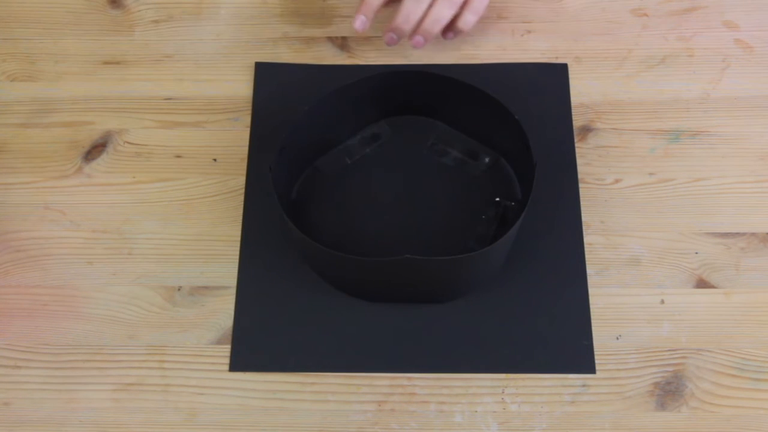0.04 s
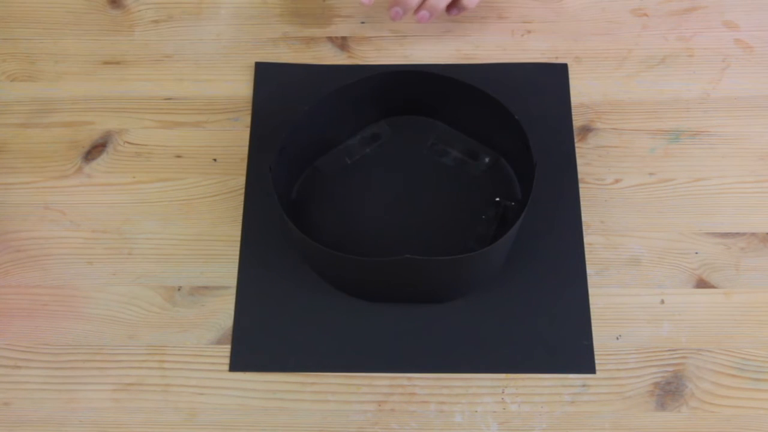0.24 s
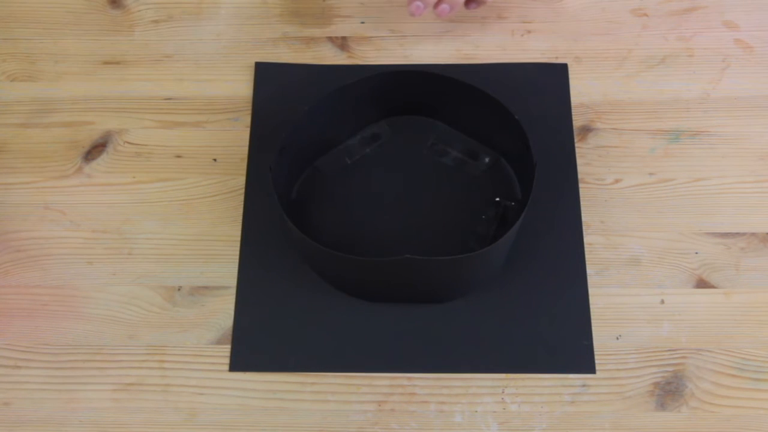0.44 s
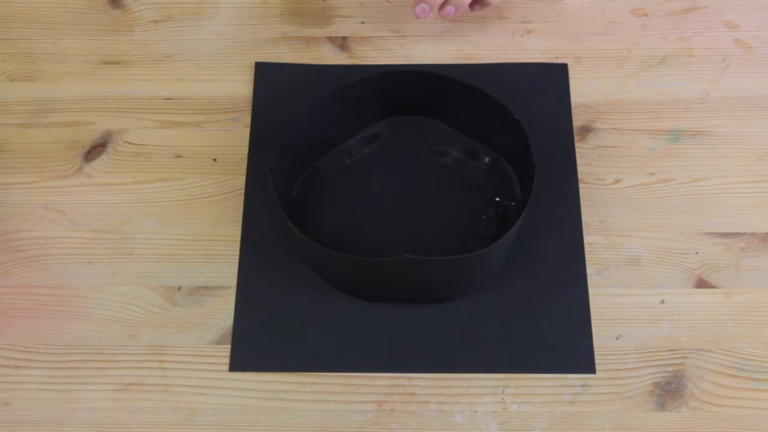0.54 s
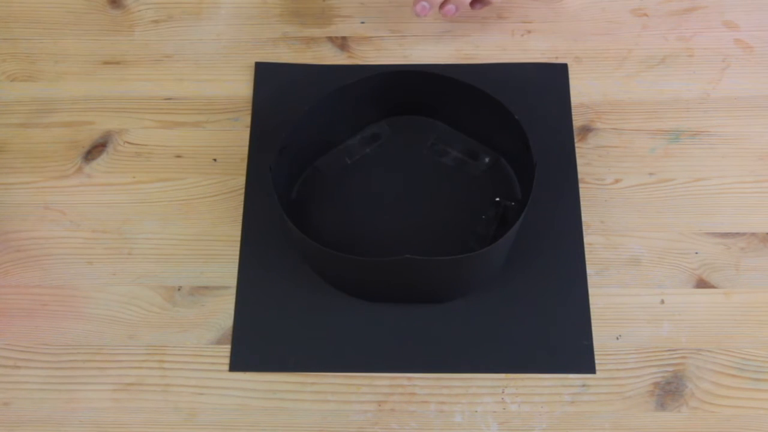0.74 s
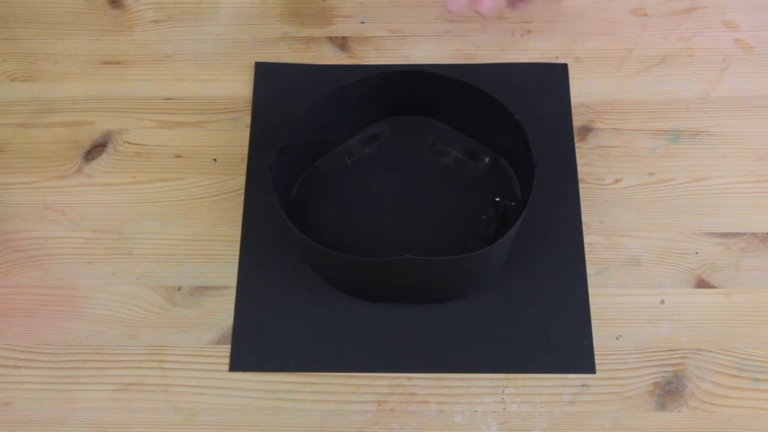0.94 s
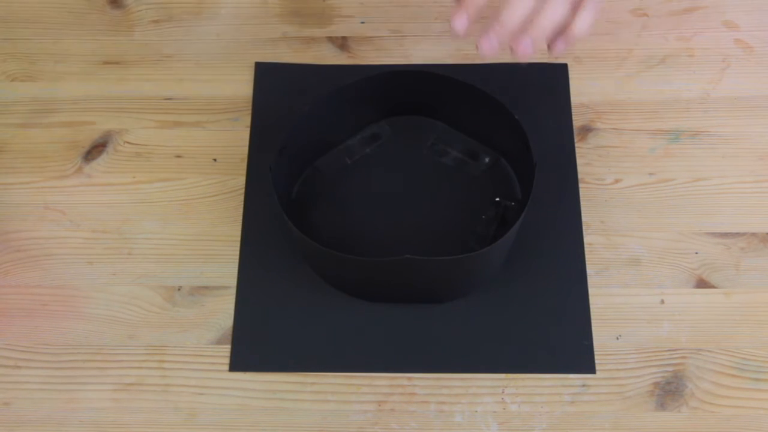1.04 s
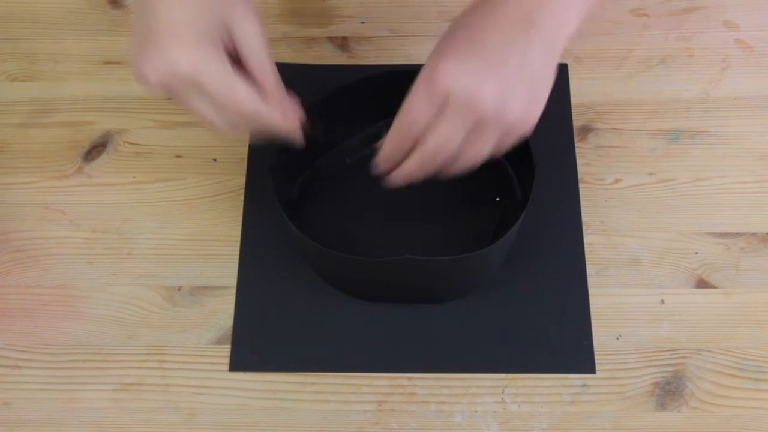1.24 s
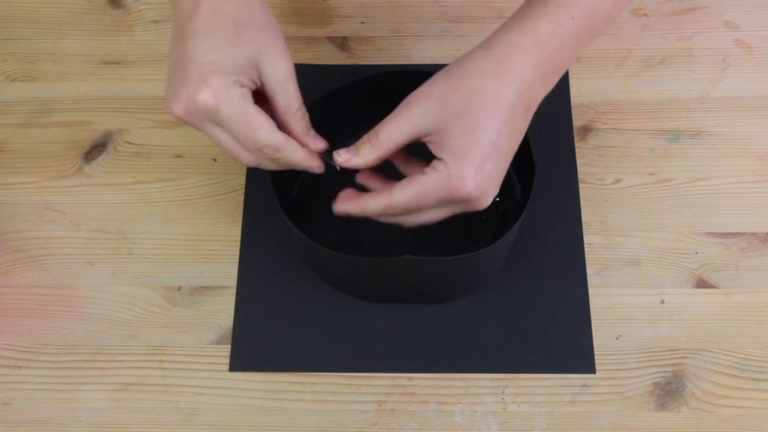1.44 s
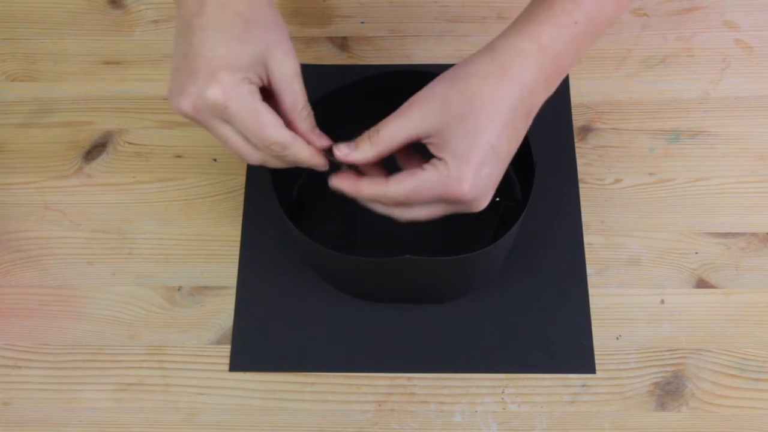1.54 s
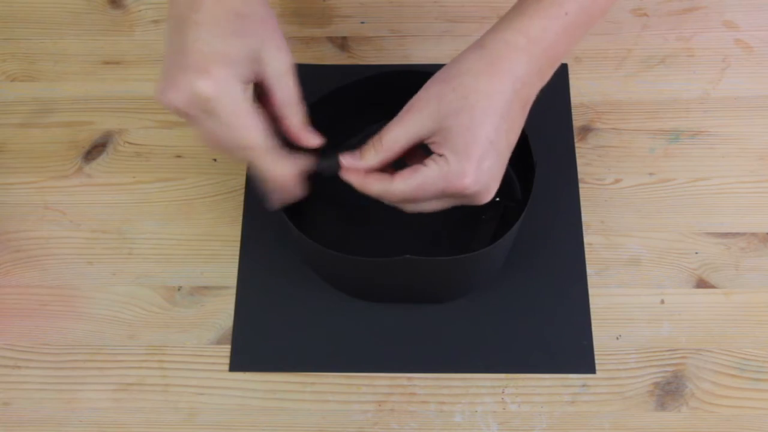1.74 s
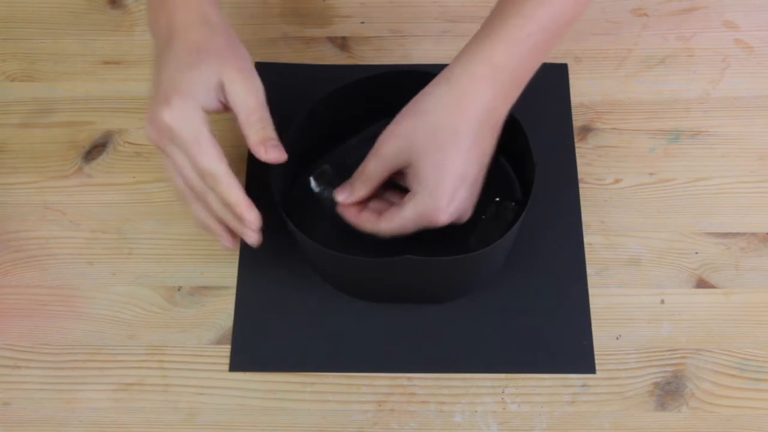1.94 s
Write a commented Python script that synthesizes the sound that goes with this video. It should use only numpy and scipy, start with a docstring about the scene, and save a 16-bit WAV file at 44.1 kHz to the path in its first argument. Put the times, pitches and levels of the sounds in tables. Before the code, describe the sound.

After a quiet start, tape peels loudly in three raspy bursts with hollow roll clicks and soft table bumps; light finger rustling follows, then a brief crackle on card, heard close in a small room.

```python
"""Sticky tape is peeled off its roll in three bursts: each snap of the glue is a spike, a noisy crack and rough rings.
Fine crackle follows the pull, the roll jolts, and the freed strip drums; later a piece is pressed down on card.
Fingers tick and rustle on the film (puffs of filtered noise), and the table thuds (fading sine waves).
A small room answers with fading noise, over a low wavering rumble and steady hiss.
A gain control turns everything down after loud sounds, so the room tone drops after the pull."""
import sys
import numpy as np
from scipy import signal
from scipy.fft import rfft, irfft
from scipy.io import wavfile
from scipy.ndimage import map_coordinates

SR = 44100
rng = np.random.default_rng(int(sys.argv[2]) if len(sys.argv) > 2 else 0)


def materialize(psi):
    """Save the field psi as 16-bit PCM at rate SR to the path in sys.argv[1].

    A 1-D psi becomes a single channel; in a 2-D psi each row is a channel.
    """
    bounded = np.clip(np.atleast_2d(psi).T, -1, 1)
    quanta = np.round(bounded * 32767).astype(np.int16)
    wavfile.write(sys.argv[1], SR, quanta)


def invert_db(level):
    """Linear amplitude ratio for a level in decibels (20 dB per decade), elementwise."""
    return 10 ** (np.asarray(level, dtype=float) / 20)


N = 88200  # samples, two seconds

# Glue letting go. Each row: start in seconds, level in dB before a shared gain, roll ring in dB against
# the crack before a shared lift, roll ring frequency in Hz, film ring frequency in Hz.
GLUE_SNAPS = [(0.2212, -10, -24, 2200, 11100), (0.2242, -32, -25, 2440, 11800),
              (0.2329, -26, -19, 4470, 14100), (0.2367, -7, -26, 4330, 15000),
              (0.2405, -9.5, -26, 3000, 14000), (0.2416, -3, -22, 3705, 10200),
              (0.2517, -16.5, -9, 3900, 11100), (0.2562, -8.5, -25, 2760, 10000),
              (0.2592, -9.5, -8.5, 3100, 7650), (0.2672, -22, -8, 4500, 13500),
              (0.2712, -23, -19, 3120, 10300), (0.326, -4, -19, 3280, 14000), (0.3302, -6, -18, 3780, 9200),
              (0.3457, -2.5, -17.5, 2970, 12400), (0.349, -5.5, -11, 2250, 11200),
              (0.353, -6, -9, 1980, 11300), (0.3578, -5.5, -10, 2090, 11200),
              (0.3686, -8.5, -19, 4700, 10700), (0.376, -5.5, -7.5, 2530, 12100),
              (0.3805, -4, -13, 4900, 10600), (0.3844, -14, -11, 4730, 13000),
              (0.3947, -4.5, -16.5, 4800, 5900), (0.4098, -5.5, -8.5, 2760, 9300),
              (0.4182, -7, -10.5, 3140, 9500), (0.4208, -9, -13.5, 2300, 10500),
              (0.4269, -10, -19, 2800, 10000), (0.4291, -8.5, -15, 3000, 10000),
              (0.4336, -8.5, -14.5, 4080, 9720), (0.4391, -14.5, -7, 4150, 14800),
              (0.4445, -14.5, -7.5, 4000, 12300), (0.4478, -10.5, -11, 2000, 10000),
              (0.4539, -11.5, -8.5, 2440, 10470), (0.4607, -7.5, -8, 4200, 10600),
              (0.468, -3, -13.5, 2900, 11000), (0.4712, -7, -8, 2960, 11500),
              (0.4731, -6, -14.5, 4000, 11000), (0.4889, -3, -8.5, 2760, 11100),
              (0.497, -6, -8.5, 2880, 8600), (0.5007, -9, -22, 3530, 11600), (0.592, 2, -8, 2960, 11300),
              (0.5947, 3, -17, 2900, 11500), (0.6091, 3, -12.5, 2610, 12700), (0.6149, 1, -15, 2830, 8900),
              (0.6233, -18.5, -12, 3160, 8800), (0.6323, -15, 4, 2440, 14300),
              (0.6388, -20.5, -7, 2180, 10600), (0.661, -19.5, 2, 3600, 8200),
              (0.696, -19.5, -22, 4100, 10400), (0.7047, -1.5, -31, 3000, 10500),
              (0.7072, -1.5, -11.5, 2455, 8200), (0.711, -13, -19, 2860, 10900)]
# Colour of the peeling tape. Each row: frequency in Hz, relative level per Hz in dB.
TAPE_COLOUR = [(150, -77.5), (250, -27.5), (400, -24.5), (484, -9), (547, -21), (710, -14), (1610, -11.5),
               (1980, 2.5), (2280, -9.5), (2530, -2), (4410, -4), (9830, -1.5), (16000, -3)]
# Effort behind the fine crackle, one list for each pull and a last one for the pressing.
# Each row: time in seconds, level in dB.
PULL_EFFORTS = [
    [(.219, -58), (.235, -42), (.245, -34.5), (.262, -19.5), (.275, -56)],
    [(.325, -15.5), (.345, -39.5), (.36, -18), (.40, -26), (.42, -13.5), (.47, -14.5), (.485, -18),
     (.5, -12), (.512, -39)],
    [(.591, -35), (.597, -23.5), (.606, -30), (.62, -22.5), (.64, -33), (.665, -22), (.69, -44),
     (.706, -15), (.72, -42.5)],
    [(1.66, -60), (1.68, -38), (1.692, -17.5), (1.71, -33.5), (1.72, -22), (1.734, -24), (1.745, -32.5),
     (1.78, -48)],
]
# The roll jolts in the hand during the last pull, at its start and again near its end.
# Each row: start in seconds, level in dB, extra level of the upper tones in dB.
ROLL_JOLTS = [(.592, -9.5, -19), (0.5954, -13, -2), (0.608, -8, -12), (.6155, -10, -12), (0.622, -23, -9),
              (0.7059, -18.5, 14), (.7062, -5, 3.5), (.711, -24.5, -16)]
# Tones of the hollow roll. Each row: frequency in Hz, relative level in dB, time to fade by 60 dB in seconds.
ROLL_TONES = [(851, -26.5, 0.059), (1353, -8.5, 0.02), (2520, 1, 0.0079), (2688, 13.5, 0.0089),
              (2960, -1.5, 0.012), (3830, 8, 0.0083), (4300, 3.5, 0.008), (8200, -1, .006)]
# The freed strip drums lower as it grows longer. Each row: time in seconds, frequency in Hz,
# drumming in dB against the snap's table level.
STRIP_DRUMMING = [(.22, 880, -23.5), (.27, 813, -29), (.33, 715, -28.5), (.42, 518, -26), (.5, 436, -28),
                  (.62, 437, -36)]
# Film creasing as the piece is pressed on the card. Each row: start in seconds, level in dB before a shared
# gain, roll ring in dB against the crack before a shared lift, roll ring in Hz, film ring in Hz.
PRESS_CREASES = [(1.6826, -34, -17, 4000, 12000), (1.6906, -8, -10, 2306, 14700),
                 (1.7023, -19, -5, 2410, 6160), (1.7132, -14.5, -17, 3120, 14900),
                 (1.7159, -14, -8, 3120, 14000), (1.7196, -18, -4.5, 4300, 14300),
                 (1.728, -8.5, -13.5, 4300, 13200)]
# Colour of film crumpling on card. Each row: frequency in Hz, relative level per Hz in dB.
PRESSED_COLOUR = [(150, -53), (250, -35), (938, -9), (1080, -17), (1280, -4.5), (1670, -12), (2570, -5),
                  (9660, -6.5), (13000, -5.5), (16000, -4.5)]
# Light finger contacts on film and card. Each row: start in seconds, level in dB before a shared gain,
# roll ring in dB against the crack before a shared lift, roll ring in Hz, film ring in Hz.
FINGER_TICKS = [(0.0161, -44, -1.5, 4110, 6030), (0.1271, -37.5, -5.5, 2640, 11000),
                (0.1591, -63, -16, 2530, 9800), (0.1816, -49.5, -11, 1910, 10400),
                (0.9639, -32, -32, 2430, 10100), (0.9951, -34, -9, 3680, 11700),
                (1.0166, -46, 6, 1970, 7370), (1.0562, -44, -1, 2480, 13800),
                (1.1995, -40, -33, 3000, 13500), (1.2112, -38, -32, 4160, 8700),
                (1.2317, -47, -23, 3100, 5680), (1.2436, -59, -22, 1490, 7200),
                (1.2576, -61, -15, 4000, 8350), (1.2694, -46, -25, 4600, 5900),
                (1.2879, -55, -20, 1500, 14700), (1.3154, -41, -15, 1497, 6300),
                (1.5961, -59, -7, 2340, 10400), (1.6598, -34.5, -23, 1980, 12100),
                (1.6697, -45, -12, 1520, 11900)]
# Loudness of the finger rustle. Each row: time in seconds, level in dB.
RUSTLE_LEVEL = [(0, -70.5), (.2, -58.5), (.22, -80), (.95, -69.5), (1.0, -51.5), (1.06, -48), (1.14, -44),
                (1.21, -46), (1.27, -48), (1.33, -66.5), (1.4, -91), (1.93, -65.5), (1.96, -53), (2, -66.5)]
# Bright colour of the film. Each row: frequency in Hz, relative level per Hz in dB.
BRIGHT_COLOUR = [(1180, -36), (2000, -12), (2420, -8.5), (2640, -19), (2830, -8), (5880, -16),
                 (10200, -3.5), (16000, -3.5)]
# Flatter colour once the fingers close on the film. Each row: frequency in Hz, relative level per Hz in dB.
DULL_COLOUR = [(1180, -44), (2000, -18), (2880, -29), (4080, -9), (6940, -5), (14200, -5.5), (16000, -7)]
# A hand brushes the card. Each row: time in seconds, level in dB.
BRUSH_LEVEL = [(1.012, -72), (1.017, -43.5), (1.03, -58), (1.05, -56), (1.1, -63), (1.16, -65)]
# Dull colour of the card. Each row: frequency in Hz, relative level per Hz in dB.
CARD_COLOUR = [(1200, -44), (1800, -9.5), (2000, -7), (2400, 4), (2800, -9), (4000, -39)]
# Bumps on the table. Each row: start in seconds, level in dB, level of all tones but the first in dB.
TABLE_THUDS = [(0.239, -63.5, -8), (0.599, -31.5, -12), (0.702, -31, -17), (0.761, -23, -23),
               (0.829, -54, -20), (1.014, -50.5, 8.5)]
# Tones of the table top. Each row: frequency in Hz, time to fade by 60 dB in seconds.
TABLE_TONES = [(127.7, 0.36), (70, .15), (170, 0.14), (214, 0.14), (273, 0.16), (472, 0.05)]
# How long the room answers. Each row: frequency in Hz, time to fade by 60 dB in seconds.
ROOM_FADE = [(300, .25), (1000, 0.5), (2600, 0.33), (6000, .33), (15000, 0.23)]
# Colour of the room tone. Each row: frequency in Hz, relative level per Hz in dB.
ROOM_TONE_COLOUR = [(12, -55.5), (20, -16), (49, -8), (163, 0), (301, -12), (434, -14.5), (527, -19.5),
                    (574, -16.5), (1260, -18), (1400, -20.5), (1660, -21.5), (16000, -34)]

# A T60 is the time to fade by 60 dB.
CRACK_T60_S, FILM_T60_S, BODY_T60_S = 0.008, 0.005, 0.018
CRACK_DB, SPIKE_DB, FILM_DB, BODY_LIFT_DB = -3, 9.5, -2, 1.5
SNAP_GAIN_DB, PRESS_GAIN_DB, TICK_GAIN_DB = 1, 1, 2.5
RING_ROUGH, JOLT_ROUGH = 0.13, 0.045  # radians of phase wander a sample
THIN_HZ, JOLT_THIN_HZ = 460, 700  # clicks and jolts lose the sound below these
CRACKLE_PER_S, CRACKLE_SPREAD_DB = 2700, 3
CREASE_PER_S, CREASE_SPREAD_DB = 5400, 3.5
RUSTLE_PER_S, RUSTLE_SPREAD_DB = 4100, 3
PUFF_S = 0.00054  # time for a puff to shrink to 37 %
UPPER_HZ, JOLT_RISE_S = 3500, 0.0004
STRIP_T60_S, STRIP_RISE_S, TORN_OFF_S = 0.063, 0.003, 0.7
FLATTEN_S = 1.143, 1.265  # start and end of the film losing its bright edge
THUD_RISE_S = 0.0034
WET_DB, FIRST_WALL_S = -9, 0.003
ROOM_TONE_DB, HISS_ABOVE_HZ = -49.5, 380
RUMBLE_WAVER_DB, WAVERS_PER_S = 1, 12
DUCK_ABOVE_DB = -38
QUICK_SHARE, QUICK_LAG_S = 0.14, 0.037
SLOW_SHARE, SLOW_LAG_S = 0.68, 0.2
CEILING, TOP_HZ = 0.85, 16000


def unit(x):
    """Scales a sound to an rms of 1."""
    return x / np.sqrt(np.mean(x ** 2) + 1e-20)


def along(points, hz):
    """Reads a table of (Hz, value) rows between its points, on a log frequency axis."""
    f, v = np.transpose(points)
    return np.interp(np.log(hz + 1), np.log(f + 1), v)


def curve(rows):
    """Turns (seconds, dB) rows into one dB value a sample, practically silent outside them."""
    s, db = np.transpose(rows)
    return np.interp(np.arange(N) / SR, s, db, left=-150, right=-150)


def coloured(x, spectrum):
    """Filters x to the given spectrum with a response that never starts before its cause."""
    level = invert_db(along(spectrum, np.fft.rfftfreq(2048, 1 / SR)))
    cepstrum = irfft(np.log(level + 1e-6))
    # fold the backward half onto the forward half: minimum phase
    cepstrum[1:1024] *= 2
    cepstrum[1025:] = 0
    response = irfft(np.exp(rfft(cepstrum)))
    return signal.fftconvolve(x, response)[:len(x)]


def lag(x, seconds):
    """Smooths x so that it follows changes with a delay (one-pole low-pass)."""
    pole = np.exp(-1 / (seconds * SR))
    return signal.lfilter([1 - pole], [1, -pole], x)


def high_pass(x, hz):
    """Takes away the sound below hz."""
    return signal.sosfilt(signal.butter(3, hz, "high", fs=SR, output="sos"), x)


def rough_ring(t, hz, t60, wander):
    """A fading sine wave made rough by random steps of its phase."""
    phase = 2 * np.pi * hz * t + np.cumsum(wander)
    return invert_db(-60 * t / t60) * np.sin(phase)


def clicks(table, gain_db, spectrum):
    """A sudden release gives a spike and a broad crack, and rings the roll and the film."""
    out, t = np.zeros(N + SR), np.arange(SR // 40) / SR
    spike = coloured(1.0 * (t == 0), spectrum)
    spike = invert_db(SPIKE_DB) * spike / np.linalg.norm(spike)
    for s, db, body_db, body_hz, film_hz in table:
        noise = rng.standard_normal((3, len(t)))
        crack = invert_db(CRACK_DB - 60 * t / CRACK_T60_S) * unit(coloured(noise[0], spectrum))
        film = invert_db(FILM_DB) * rough_ring(t, film_hz, FILM_T60_S, RING_ROUGH * noise[1])
        body = rough_ring(t, body_hz, BODY_T60_S, RING_ROUGH * noise[2])
        sound = spike + crack + film + invert_db(body_db + BODY_LIFT_DB) * body
        out[round(s * SR):][:len(t)] += invert_db(db + gain_db) * sound
    return high_pass(out[:N], THIN_HZ)


def grains(per_s, spread_db, spectrum):
    """Random tiny releases of uneven size, each a short puff of noise; rms 1 overall."""
    draw = rng.random((2, N))
    happens = draw[0] < per_s / SR
    sizes = happens * invert_db(-spread_db * np.log(draw[1] + 1e-9))  # spread_db is the mean boost
    puffs = signal.lfilter([1], [1, -np.exp(-1 / (PUFF_S * SR))], sizes)
    return unit(coloured(puffs * rng.standard_normal(N), spectrum))


def peeling():
    """Glue lets go in big snaps over a fine crackle that follows the pull; roll and strip join in."""
    effort = sum(invert_db(curve(pull)) for pull in PULL_EFFORTS[:-1])
    crackle = effort * grains(CRACKLE_PER_S, CRACKLE_SPREAD_DB, TAPE_COLOUR)
    return clicks(GLUE_SNAPS, SNAP_GAIN_DB, TAPE_COLOUR) + crackle + jolts() + strip()


def jolts():
    """Every jolt rings the same fast-fading tones of the hollow roll, each a little differently."""
    out, t = np.zeros(N + SR), np.arange(SR // 20) / SR
    rise = 1 - np.exp(-t / JOLT_RISE_S)
    for s, db, upper_db in ROLL_JOLTS:
        ring = np.zeros(len(t))
        for hz, level_db, t60 in ROLL_TONES:
            wander = JOLT_ROUGH * rng.standard_normal(len(t))
            ring += invert_db(level_db + upper_db * (hz > UPPER_HZ)) * rough_ring(t, hz, t60, wander)
        out[round(s * SR):][:len(t)] += invert_db(db) * ring * rise
    return high_pass(out[:N], JOLT_THIN_HZ)


def strip():
    """Every snap plucks the taut freed strip, a fading sine wave, until it is torn off."""
    out, t = np.zeros(N + SR), np.arange(SR // 10) / SR
    rise = 1 - np.exp(-t / STRIP_RISE_S)
    times, pitches, levels = np.transpose(STRIP_DRUMMING)
    for s, db, *_ in GLUE_SNAPS:
        if s < TORN_OFF_S:
            hz, under_db = np.interp(s, times, pitches), np.interp(s, times, levels)
            fade = invert_db(db + under_db - 60 * t / STRIP_T60_S)
            out[round(s * SR):][:len(t)] += fade * np.sin(2 * np.pi * hz * t) * rise
    return out[:N]


def pressing():
    """The piece is pressed on the card: the film creases in clicks over a fine crumple."""
    crumple = grains(CREASE_PER_S, CREASE_SPREAD_DB, PRESSED_COLOUR)
    creases = clicks(PRESS_CREASES, PRESS_GAIN_DB, PRESSED_COLOUR)
    return creases + invert_db(curve(PULL_EFFORTS[-1])) * crumple


def fingers():
    """Skin slides on film and card as many tiny puffs, with separate ticks."""
    bright = grains(RUSTLE_PER_S, RUSTLE_SPREAD_DB, BRIGHT_COLOUR)
    dull = grains(RUSTLE_PER_S, RUSTLE_SPREAD_DB, DULL_COLOUR)
    # cosine and sine crossfade keeps the power steady
    turn = np.interp(np.arange(N) / SR, FLATTEN_S, [0, np.pi / 2])
    rustle = invert_db(curve(RUSTLE_LEVEL)) * (np.cos(turn) * bright + np.sin(turn) * dull)
    brush = invert_db(curve(BRUSH_LEVEL)) * grains(RUSTLE_PER_S, RUSTLE_SPREAD_DB, CARD_COLOUR)
    return rustle + brush + clicks(FINGER_TICKS, TICK_GAIN_DB, BRIGHT_COLOUR)


def thuds():
    """Soft bumps of hand and roll ring the table top as fading sine waves."""
    out, t = np.zeros(N + SR), np.arange(SR // 2) / SR
    rise = 1 - np.exp(-t / THUD_RISE_S)
    for s, db, upper_db in TABLE_THUDS:
        ring = np.zeros(len(t))
        for k, (hz, t60) in enumerate(TABLE_TONES):
            ring += invert_db(upper_db * (k > 0) - 60 * t / t60) * np.sin(2 * np.pi * hz * t)
        out[round(s * SR):][:len(t)] += invert_db(db) * ring * rise
    return out[:N]


def room(x):
    """The room answers with noise in which each frequency dies at its own speed."""
    hz, t, z = signal.stft(rng.standard_normal(SR // 2), SR, nperseg=256)
    fade = invert_db(-60 * t / along(ROOM_FADE, hz)[:, None])
    tail = signal.istft(z * fade, SR, nperseg=256)[1]
    delayed = np.pad(x, (round(FIRST_WALL_S * SR), 0))
    return signal.fftconvolve(delayed, tail / np.linalg.norm(tail))[:N]


def room_tone():
    """Filtered noise: a low building rumble that wavers, and a steady hiss."""
    waver = map_coordinates(rng.standard_normal(40), [np.arange(N) * WAVERS_PER_S / SR])
    # the first 4096 samples let the filter settle
    tone = unit(coloured(rng.standard_normal(N + 4096), ROOM_TONE_COLOUR)[4096:])
    rumble = signal.sosfiltfilt(signal.butter(2, HISS_ABOVE_HZ, fs=SR, output="sos"), tone)
    hiss = tone - rumble
    return invert_db(ROOM_TONE_DB) * (hiss + invert_db(RUMBLE_WAVER_DB * waver) * rumble)


def scene():
    """Adds up everything at the microphone, as one channel."""
    near = peeling() + pressing() + fingers()
    return (near + invert_db(WET_DB) * room(near) + thuds() + room_tone())[None]


def band_limit(x):
    """A steep low-pass at the top of the band."""
    return signal.sosfilt(signal.butter(12, 17120, fs=SR, output="sos"), x)


def record(dry):
    """Gain control with a quick and a slow part, then soft clipping and a treble limit."""
    level_db = 10 * np.log10(lag(dry[0] ** 2, 0.01) + 1e-12)
    over_db = np.maximum(level_db - DUCK_ABOVE_DB, 0)
    quick_db = QUICK_SHARE * lag(over_db, QUICK_LAG_S)
    slow_db = SLOW_SHARE * lag(lag(over_db, SLOW_LAG_S), SLOW_LAG_S)
    ducked = dry * invert_db(-quick_db - slow_db)
    clipped = ducked / (1 + np.abs(ducked / CEILING) ** 6) ** (1 / 6)
    mix = signal.sosfilt(signal.butter(16, TOP_HZ, fs=SR, output="sos"), clipped)
    return band_limit(mix)


dry = scene()
out = record(dry)
materialize(out)
```